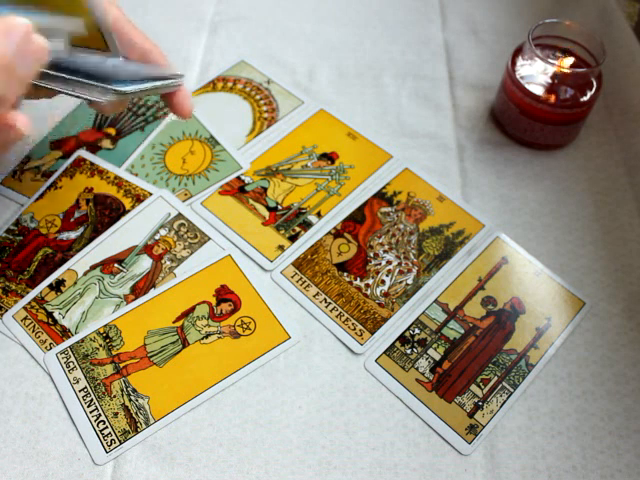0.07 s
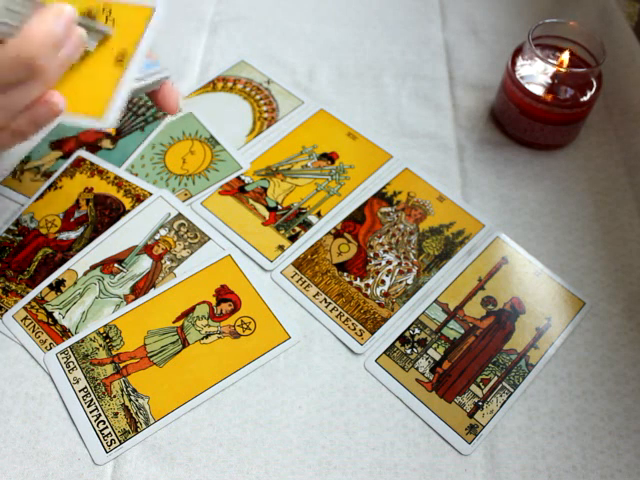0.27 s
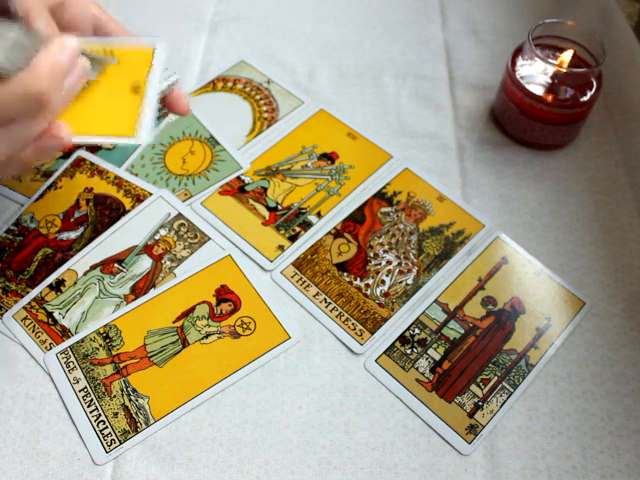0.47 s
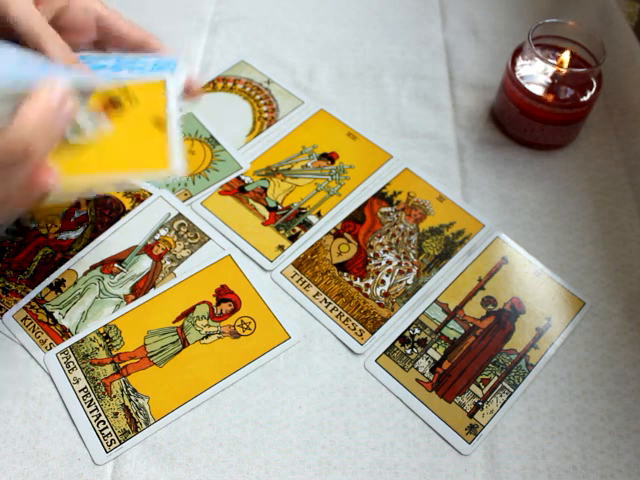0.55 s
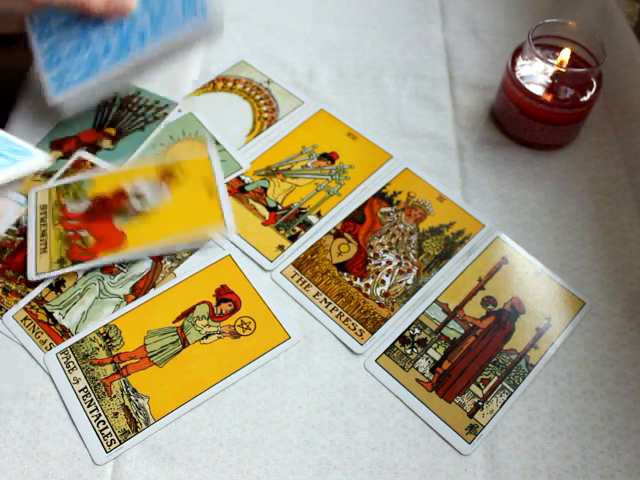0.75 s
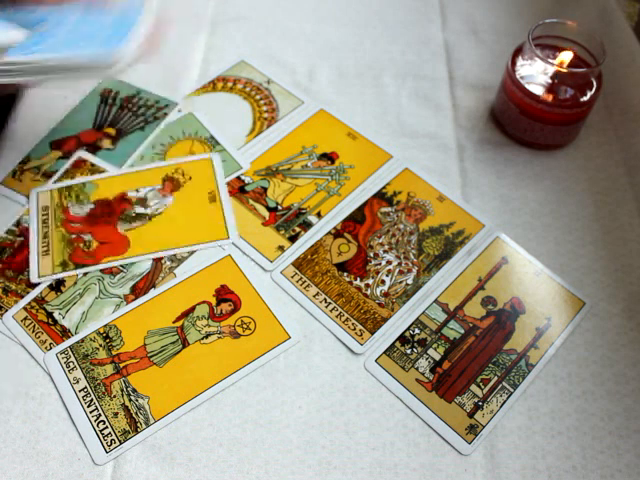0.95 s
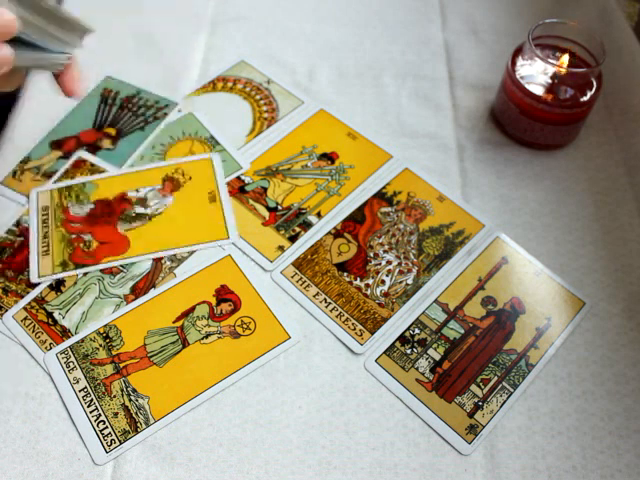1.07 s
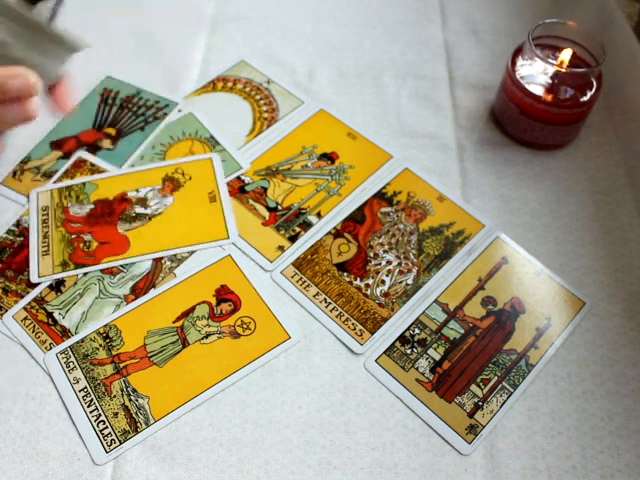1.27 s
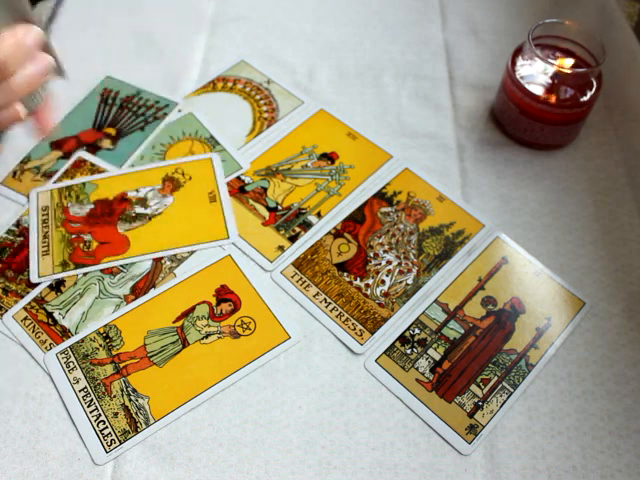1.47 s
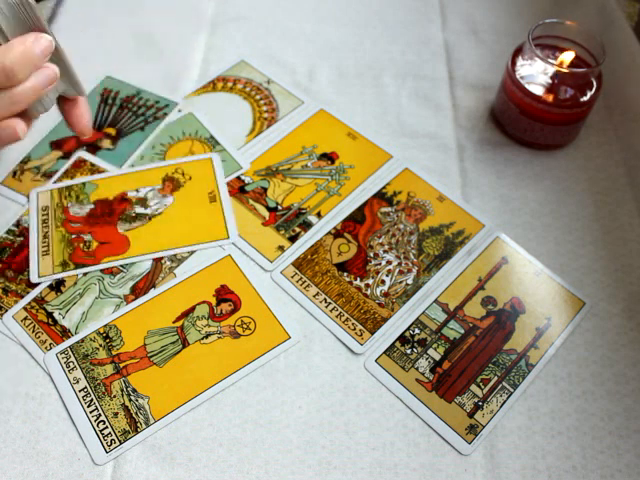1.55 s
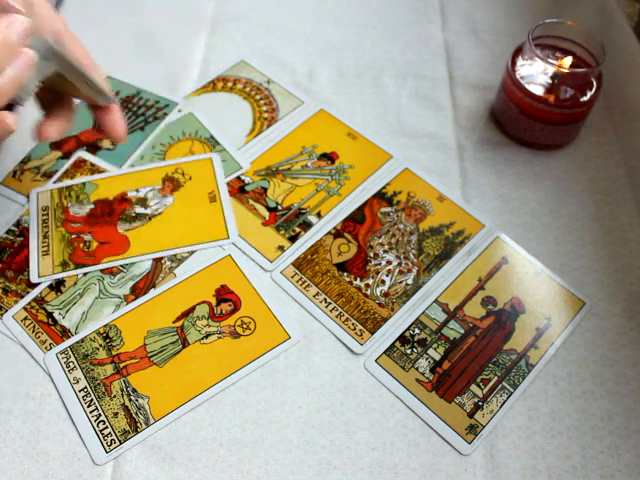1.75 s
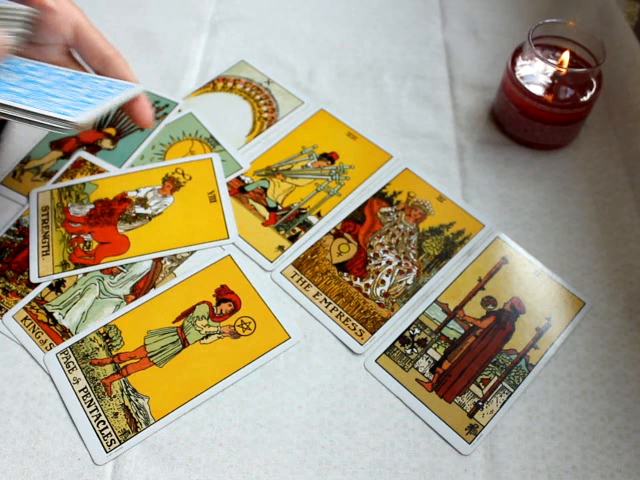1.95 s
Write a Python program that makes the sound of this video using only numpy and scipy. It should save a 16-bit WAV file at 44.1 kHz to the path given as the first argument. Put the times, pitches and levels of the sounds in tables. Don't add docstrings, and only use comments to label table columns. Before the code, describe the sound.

Glossy playing cards are handled close to the microphone in a small room. Soft slips and ticks until 0.2 s, then a loud, crackling packet slap at 0.23-0.28 s over short low thuds. Faint rubs follow; a card lands at 0.69 s, with snaps near 0.79 and 0.82 s. Sharp squaring clicks come at 1.07-1.11 s, tiny rubs around 1.3 s and 1.8 s, over faint hiss.

```python
import sys
import numpy as np
from scipy import signal
from scipy.fft import rfft, irfft
from scipy.io import wavfile
from scipy.ndimage import uniform_filter1d

SR = 44100
rng = np.random.default_rng(int(sys.argv[2]) if len(sys.argv) > 2 else 0)


def transcribe(signal):
    frames = np.atleast_2d(signal).T
    limited = np.clip(frames, -1, 1)
    pcm = np.round(limited * 32767).astype(np.int16)
    wavfile.write(sys.argv[1], SR, pcm)


def invert_db(level):
    return 10 ** (np.asarray(level, dtype=float) / 20)


N = 85995


def rms_one(x):
    return x / np.sqrt(np.mean(x ** 2) + 1e-20)


def at_hz(points, hz):
    table_hz, values = np.array(points).T
    return np.interp(np.log(hz), np.log(table_hz), values)


def coloured(x, gain):
    hz = np.maximum(np.fft.rfftfreq(len(x), 1 / SR), 10)
    return irfft(rfft(x) * gain(hz), len(x))


def band(x, low_hz, high_hz, order=1):
    return signal.sosfilt(signal.butter(order, [low_hz, high_hz], "band", fs=SR, output="sos"), x)


def decaying(hz, t60, t):
    onset = 1 - np.exp(-t * hz / 0.26)
    return np.sin(2 * np.pi * hz * t) * invert_db(-60 * t / t60) * onset


def rings(rows):
    t = np.arange(N) / SR
    out = np.zeros(N)
    for start, db, hz, t60 in rows:
        out += invert_db(db) * decaying(hz, t60, np.maximum(t - start, 0))
    return out


# (time [s], ring level [dB], ring pitch [Hz], ring t60 [s], crack level [dB])
SLAP = [(.2326, -15, 1680, 0.007, -22), (.2355, -9, 827, 0.011, -52), (.2373, -29, 4670, 0.0018, -8.5),
        (.2376, -11.5, 1040, 0.013, -9.5), (.2392, -6, 2170, 0.0041, -54), (.2444, -2, 2340, 0.0051, 1),
        (.2447, -19, 4230, 0.0021, -11), (.2462, -9, 1800, 0.0083, -5), (.2508, -2.5, 1480, 0.0072, -10),
        (.2530, -9.5, 1750, 0.011, -12.5), (.2561, -4, 1760, 0.0046, -13), (.2563, -14, 4100, 0.0022, -20),
        (.2578, 4, 2030, 0.0046, -11), (.2593, -4.5, 1434, 0.0095, -19), (.2603, -0.5, 1504, 0.01, -18),
        (.2610, -11, 6140, 0.0037, -32), (.2632, -14, 3600, 0.0062, -32), (.2760, -25, 1770, 0.0037, -43),
        (.3105, -30.5, 1620, 0.0074, -23.5)]
SNAPS = [(.6917, -9, 2750, 0.008, -16), (.6922, -19, 1160, 0.012, -55), (.6972, -12, 1880, 0.0048, -18.5),
         (.6980, -14, 1036, 0.033, -51), (.7028, -26, 1120, 0.018, -48), (.7075, -20, 1010, 0.0075, -45),
         (.7005, -20, 3150, 0.0084, -50), (.7047, -15.5, 2860, 0.0031, -49),
         (.7373, -25.5, 2730, 0.01, -26.5), (.7883, -24, 4000, 0.0034, -18),
         (.7900, -28, 4580, 0.0092, -42), (.8223, -23.5, 2380, 0.0085, -24.5),
         (.8230, -22, 5330, 0.004, -19.5), (1.0715, -21, 6850, 0.0017, -24.5),
         (1.0868, -17.5, 2020, 0.0066, -35), (1.0870, -23.5, 3700, 0.0077, -15),
         (1.0898, -27, 2050, 0.014, -19.5), (1.1062, -15, 2300, 0.0057, -35),
         (1.1096, -12.5, 3360, 0.006, -20.5), (1.1100, -22, 940, 0.012, -42),
         (1.1155, -20, 2380, 0.0062, -41)]
TICKS = [(.0580, -46, 1910, .012, -64), (.0955, -33, 3540, 0.011, -33), (.0980, -48.5, 878, 0.065, -55),
         (.1885, -24.5, 3040, 0.0023, -45), (.1915, -20.5, 1890, 0.0024, -48),
         (.2000, -33, 1500, .005, -51), (.2140, -21, 1180, 0.0021, -36), (.4335, -22, 2620, 0.0016, -28.5),
         (.5055, -41, 2480, 0.0077, -61), (.5290, -35.5, 1900, 0.0056, -37), (.5535, -52, 2200, .003, -42),
         (.5870, -39, 950, 0.035, -66), (.5868, -32, 3600, 0.0048, -41), (.6080, -38, 930, 0.0069, -64),
         (.6082, -41, 3600, .003, -37), (.6545, -38.5, 1143, 0.04, -60), (.7600, -52, 990, 0.027, -62),
         (.8110, -33, 4200, 0.007, -61), (1.2780, -48, 1020, 0.017, -62),
         (1.3150, -39.5, 2330, 0.0087, -44), (1.3160, -44.5, 1120, 0.021, -51),
         (1.7896, -32, 2700, 0.0058, -34), (1.8390, -49, 4000, .004, -31),
         (1.8910, -41, 2600, 0.0073, -37.5)]


def contacts():
    upper_ratio, upper_db = 1.75, -5.5
    flutter_db, flutter_s = -17, 0.004
    crack_s, crack_low_hz, crack_ratio = 0.00066, 1380, 1.74
    length = 4000
    out, t = np.zeros(N + length), np.arange(length) / SR
    for start, ring_db, hz, t60, crack_db in SLAP + SNAPS + TICKS:
        rattle_noise, crack_noise = rng.standard_normal((2, length))
        ring = decaying(hz, t60, t)
        ring += invert_db(upper_db) * decaying(min(hz * upper_ratio, 15000), t60 * 0.21, t)
        rattle = rms_one(band(rattle_noise, hz * 0.7, hz * 1.7))
        ring += invert_db(flutter_db) * rattle * np.exp(-t / min(flutter_s, t60 / 2))
        crack = band(crack_noise * np.exp(-t / crack_s), crack_low_hz, min(hz * crack_ratio, 14000))
        crack /= np.abs(crack).max()
        i = int(start * SR)
        out[i:i + length] += invert_db(ring_db) * ring + invert_db(crack_db) * crack
    return out[:N]


# (time [s], level [dB], pitch [Hz], t60 [s])
SLIPS = [
    (.0505, -48, 2050, .012),
    (.0580, -38.5, 1900, 0.021),
    (.0670, -41, 1800, 0.022),
    (.0750, -44, 1780, .012),
    (.0860, -47.5, 907, .05),
    (.0980, -36, 1830, 0.016),
    (.0995, -41, 2810, 0.0088),
    (.1000, -45, 5000, .006),
    (.1050, -39.5, 2880, .03),
         (.2330, -21, 5540, 0.0048), (.2375, -20, 5360, 0.0049), (0.24, -12, 1650, .006),
           (0.2445, 0, 3250, 0.0057), (.2448, -14, 4830, 0.0078), (.2480, -13, 2920, .006),
           (0.254, -17, 5600, .005), (0.2546, -4, 1230, 0.0042), (0.262, -13, 2660, 0.0069),
           (.2675, -20, 2050, 0.0084), (.2715, -25, 1680, .007), (.2340, -9.5, 520, 0.0085),
           (.2500, -11.5, 780, 0.0093), (.2560, -12, 2600, .005), (.2800, -22, 1530, 0.0071),
           (.2990, -21, 1410, 0.015),
         (.6930, -27, 4300, 0.0057), (.6972, -16.5, 1590, 0.01), (.6945, -27.5, 2200, 0.013),
         (.7130, -30, 1150, 0.0057), (.7170, -30, 3260, 0.017), (.7240, -32, 1490, .03),
         (.7005, -22, 2000, .005), (.7090, -34, 1600, .006), (.7270, -38, 3250, .02),
         (.7895, -22, 3150, .005), (.8230, -20.5, 3300, 0.0074), (.8255, -20, 2540, 0.0034),
         (.8300, -28, 2010, .009), (1.0715, -33, 2080, 0.0083), (1.0850, -21, 4480, .009),
         (1.0905, -24, 3350, .007), (1.1062, -18.5, 3570, .004), (1.1095, -27, 2400, 0.0044),
         (.4340, -24, 4200, 0.0035), (.5295, -39, 5800, 0.0044), (.4350, -44, 1970, 0.034),
         (.5050, -51, 1110, .04), (.6550, -48, 2630, .015), (1.3115, -38.5, 5870, .012),
         (1.3125, -45, 3070, .012), (1.7990, -31, 2400, .005), (1.8140, -32, 6500, 0.0089),
         (1.8240, -34, 2950, .008), (1.8280, -39, 4400, 0.0087), (1.8300, -29, 3050, .007),
         (1.8338, -34, 2600, .006), (1.8415, -31, 3000, 0.0076)]


def catching_edges():
    return rings(SLIPS)


# (start [s], rise [s], hold [s], level [dB], centre [Hz])
SLIDES = [(-.02, 0.0093, 0.039, -53.5, 1900), (0.039, 0.017, 0.037, -50.5, 1900),
          (0.063, 0.023, 0.009, -45.5, 3900), (0.2315, 0.00083, 0.029, -29.5, 1980),
          (0.438, 0.011, 0.065, -55, 2000), (0.537, 0.013, 0.1, -61, 1090),
          (0.637, 0.0049, 0.0092, -53, 2480), (0.694, 0.0039, 0.068, -47.5, 1600),
          (0.699, 0.0056, 0.071, -52, 3320), (0.815, 0.0043, .025, -45.5, 3900),
          (1.059, 0.011, 0.015, -45.5, 2420), (1.0715, 0.0009, 0.0087, -40.5, 6440),
          (1.0828, 0.00041, 0.012, -32, 4500), (1.083, .001, 0.015, -32.5, 11000),
          (1.094, 0.0023, 0.031, -34, 3000), (1.281, 0.0094, 0.059, -55, 4400),
          (1.3095, .001, 0.0092, -49.5, 4000), (1.405, 0.018, 0.027, -54.5, 3430),
          (1.542, 0.016, 0.029, -61, 3020), (1.786, 0.0018, 0.022, -48.5, 2700),
          (1.788, .002, 0.047, -48.5, 12000), (1.803, 0.0078, 0.0079, -43.5, 6800),
          (1.806, 0.0093, 0.027, -42.5, 3460), (1.892, .005, 0.0073, -59, 2480)]


def slides():
    fall_s, width_octaves, skirt_db, grain_db = 0.0075, 1, -21, 3.2
    out, t = np.zeros(N), np.arange(N) / SR
    for start, rise, hold, level_db, hz in SLIDES:
        unevenness = rms_one(band(rng.standard_normal(N), 39, 604))
        grains = rng.standard_normal(N) * invert_db(grain_db * unevenness)

        def friction_colour(f):
            hump = 1 / (1 + (np.log2(f / hz) / width_octaves) ** 4)
            return hump + invert_db(skirt_db) * f / (f + hz)

        swell = np.clip((t - start) / rise, 0, 1) ** 2
        stop = np.exp(-np.clip(t - start - rise - hold, 0, 1) / fall_s)
        out += invert_db(level_db) * swell * stop * rms_one(coloured(grains, friction_colour))
    return out


# (time [s], level [dB], pitch [Hz], t60 [s])
THUDS = [(0.191, -43, 380, 0.081), (0.2325, -23.5, 316, 0.029), (.240, -20.5, 546, 0.025),
         (0.248, -48, 129, 0.094), (0.691, -39.5, 206, 0.09), (.715, -39, 343, 0.073),
         (.790, -36, 510, 0.01), (0.822, -47.5, 275, 0.046), (1.088, -42.5, 306, 0.046),
         (1.109, -37.5, 280, 0.048), (1.147, -39, 304, 0.021), (1.789, -45, 856, 0.026)]


def thuds():
    return rings(THUDS)


# (frequency [Hz], t60 [s])
ROOM = [(200, 0.21), (600, 0.27), (1500, 0.24), (4000, 0.23), (10000, 0.21)]


def room(x):
    top_hz, gap_s = 5000, 0.0026
    t = np.arange(SR // 2) / SR
    edges = 120 * 2 ** np.arange(0, 7.6, 0.5)
    white = rng.standard_normal((2, len(t)))
    tail = np.zeros(len(t))
    for k, (low, high) in enumerate(zip(edges, edges[1:])):
        t60 = at_hz(ROOM, np.sqrt(low * high))
        tail += band(white[k % 2], low, high, order=2) * invert_db(-60 * t / t60)
    tail = signal.lfilter(*signal.butter(1, top_hz, fs=SR), tail)
    tail *= np.clip(t / gap_s - 1, 0, 1)
    return signal.fftconvolve(x, tail / np.sqrt(np.sum(tail ** 2)))[:N]


# (frequency [Hz], level per Hz [dB])
HISS = [(20, -5), (60, -11.5), (150, -3), (500, 0), (1300, 0.5), (3000, -1.5), (8000, -7.5), (16000, -10)]


def hiss():
    noise = coloured(rng.standard_normal(N), lambda hz: invert_db(at_hz(HISS, hz)))
    return invert_db(-55.5) * rms_one(noise)


def ducking(x):
    from_db, share, release_db_per_s = -19, 0.21, 105
    ramp = release_db_per_s * np.arange(N) / SR
    level_db = 10 * np.log10(uniform_filter1d(x ** 2, size=400) + 1e-12)
    held_db = np.maximum.accumulate(level_db + ramp) - ramp
    return invert_db(-share * np.maximum(held_db - from_db, 0))


def scene():
    cards = contacts() + catching_edges() + slides()
    no_bass = signal.butter(3, 315, "high", fs=SR, output="sos")
    cards = signal.sosfilt(no_bass, cards) + thuds()
    return (cards + invert_db(-15.5) * room(cards) + ducking(cards) * hiss())[None]


def band_limit(x):
    return signal.sosfilt(signal.butter(12, 16500, fs=SR, output="sos"), x)


def record(dry):
    top_cut = signal.ellip(10, 0.3, 40, 15800, fs=SR, output="sos")
    mix = np.clip(signal.sosfilt(top_cut, dry), -1, 1) + 0.001
    return band_limit(mix)


dry = scene()
out = record(dry)
transcribe(out)
```